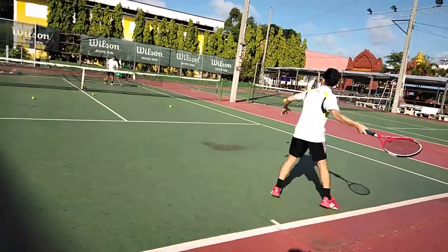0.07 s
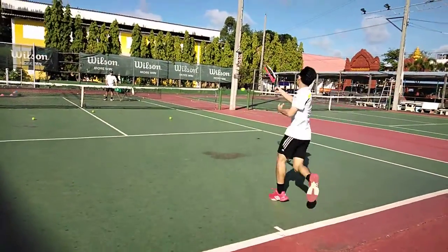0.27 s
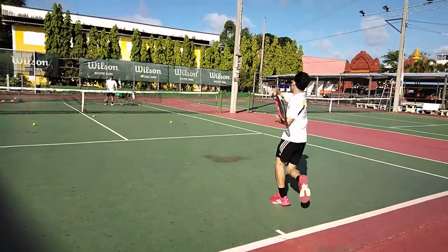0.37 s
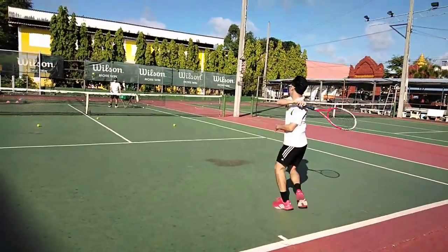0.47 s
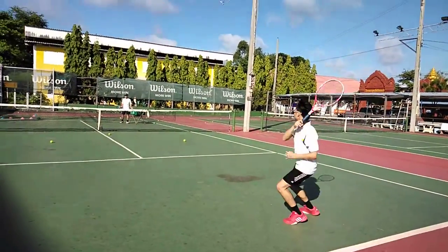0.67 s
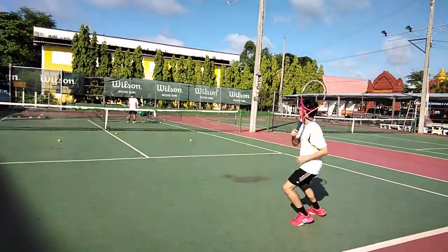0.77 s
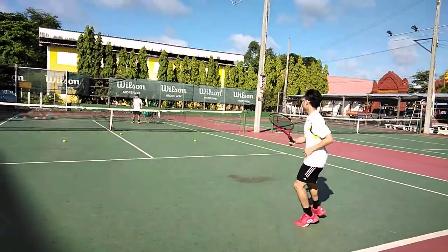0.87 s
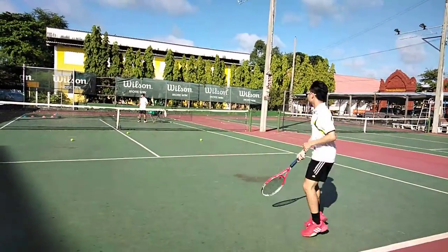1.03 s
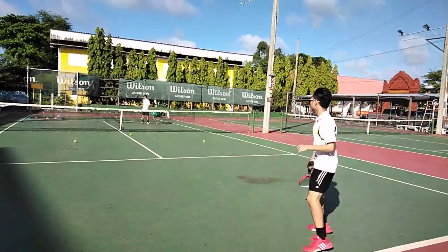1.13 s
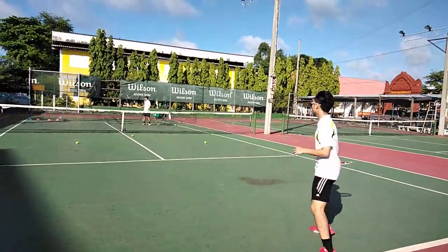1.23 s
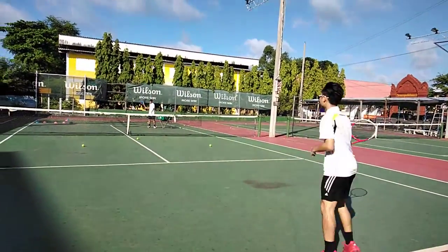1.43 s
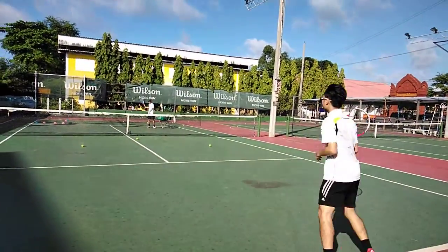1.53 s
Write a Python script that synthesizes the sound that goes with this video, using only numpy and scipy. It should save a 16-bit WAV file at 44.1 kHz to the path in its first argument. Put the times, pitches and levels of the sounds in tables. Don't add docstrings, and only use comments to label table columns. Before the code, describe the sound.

A tennis racket strikes a ball close by with a crisp, hollow pop, just after a short rising shoe squeak; then a landing sole chirps and feet scuff and tap on an open hard court.

```python
import sys
import numpy as np
from scipy import signal
from scipy.fft import rfft, irfft, next_fast_len
from scipy.io import wavfile
from scipy.ndimage import map_coordinates

SR = 44100
rng = np.random.default_rng(int(sys.argv[2]) if len(sys.argv) > 2 else 0)


def master(y):
    cut = np.clip(np.atleast_2d(y).T, -1, 1)
    pcm = np.round(cut * 32767)
    wavfile.write(sys.argv[1], SR, pcm.astype(np.int16))


def ratio(d):
    e = np.asarray(d, float) / 20
    return 10 ** e


N = 70560

SNAP_S = [
    .0006,
    .0047,
    .0065,
]


def unit(x):
    return x / np.sqrt(np.mean(x ** 2) + 1e-20)


def along(points, hz):
    f, v = np.transpose(points)
    return np.interp(np.log(hz + 1), np.log(f + 1), v)


def wobble(rate, count):
    knots = rng.standard_normal(int(count * rate / SR) + 4)
    return map_coordinates(knots, [np.arange(count) * rate / SR])


def filtered(x, response):
    m = next_fast_len(len(x) + 8192)
    return irfft(rfft(x, m) * response(np.fft.rfftfreq(m, 1 / SR)), m)[:len(x)]


def noise(response):
    return unit(filtered(rng.standard_normal(SR // 4), response))


def add(track, s, x):
    part = track[round(s * SR):][:len(x)]
    part += x[:len(part)]


def ring(hz, t60, swell, after=0):
    t = np.maximum(np.arange(SR // 4) / SR - after, 0)
    x = np.sin(2 * np.pi * hz * t) * ratio(-60 * t / t60) * (1 - np.exp(-t / swell))
    return x / np.abs(x).max()


def slips(hz, losses_db):
    turn = 2 * np.pi * np.cumsum(hz * (1 + 0.014 * wobble(500, len(hz)))) / SR
    tone = np.sin(turn)
    for k, loss in enumerate(losses_db):
        tone = tone + ratio(loss) * np.sin((k + 2) * turn)
    rasp = 1 + 0.26 * wobble(1500, len(hz))
    return tone * rasp


def traffic():
    # frequency in Hz, level in dB per Hz.
    hiss_colour = [(88, -49.5), (150, -1.5), (330, -7.5), (1170, -10.5), (1660, -16.5), (5000, -25.5),
                   (10000, -28), (16000, -28)]
    # time in seconds, level change in dB.
    drift_points = [(0, -2), (.2, -0.5), (.6, 3), (1.0, -3.5), (1.3, -2), (1.6, -1)]
    hiss = unit(filtered(rng.standard_normal(N), lambda f: ratio(along(hiss_colour, f))))
    drift_db = np.interp(np.arange(N) / SR, *np.transpose(drift_points)) + 0.2 * wobble(6.4, N)
    return ratio(-64 + drift_db) * hiss


def wind():
    # frequency in Hz, level in dB per Hz.
    rumble_colour = [(8.8, -23.5), (15, 2), (47, -0.5), (103, -8), (141, -11), (200, -22), (260, -91),
                     (440, -120)]
    # time in seconds, level in dB.
    gusts = [(0.0, -62), (0.248, -60.5), (0.454, -66), (0.664, -64), (.79, -55.5), (0.9, -61.5),
             (1.1, -61.5), (1.255, -61.5), (1.31, -65), (1.45, -61), (1.6, -64.5)]
    rumble = filtered(rng.standard_normal(N), lambda f: ratio(along(rumble_colour, f)))
    lumps = unit(rumble * ratio(2.3 * wobble(12.0, N)))
    gust_db = np.interp(np.arange(N) / SR, *np.transpose(gusts)) + 2.5
    return ratio(gust_db) * lumps


def echoes(walls, mirror, pivot_hz):
    answer, t = np.zeros(N), np.arange(SR // 4) / SR
    lead = 256
    for delay, db, tilt_db, smear in walls:
        scatter = rng.standard_normal(len(t)) * np.exp(-t / smear)
        burst = (1 - mirror) * scatter / np.linalg.norm(scatter) + mirror * (t == 0)
        tilt = lambda f: ratio(tilt_db * np.log2(np.clip(f, 150, 9000) / pivot_hz))
        burst = filtered(np.roll(burst, lead), tilt)
        add(answer, delay - lead / SR, ratio(db) * burst)
    return answer


def thin_tail():
    # frequency in Hz, t60 in seconds.
    tail_t60 = [(100, 0.6), (250, 0.66), (500, 0.93), (1000, 1.4), (4000, 0.85), (8000, 0.75),
                (15000, 0.41)]
    # frequency in Hz, level in dB.
    tail_colour = [(100, 11), (1000, -2), (2500, -0.5), (4000, -1.5), (7000, 1), (15000, 1)]
    patchy = rng.standard_normal(N) * ratio(2.1 * wobble(89.2, N))
    hz, t, z = signal.stft(patchy, SR, nperseg=256)
    decay_db = -60 * t / along(tail_t60, hz)[:, None]
    build_up = 1 - np.exp(-t / 0.04)
    z = z * ratio(decay_db + along(tail_colour, hz)[:, None]) * build_up
    tail = signal.istft(z, SR, nperseg=256)[1][:N]
    return ratio(-18.5) * tail / np.linalg.norm(tail)


def court(x, send, walls, mirror, pivot_hz):
    answer = echoes(walls, mirror, pivot_hz)
    add(answer, 0.012, thin_tail())
    sent = filtered(x, lambda f: ratio(along(send, f)))
    return x + signal.fftconvolve(sent, answer)[:N]


def scuffs_and_swish():
    scuff_starts = [.188, .2, .2, .205, .228, .242, .29, .32, .69, .713, 1.257, 1.281, 1.2812, 1.283, 1.295,
                    1.31, 1.312, 1.53, 1.53, 1.532, 1.553, 1.555, 1.58]
    # length in seconds, centre in Hz, width in octaves, level in dB.
    scuff_rows = [(.03, 6500, .6, -63), (.059, 12000, .36, -61), (.14, 2000, 2, -60),
                  (0.045, 4700, 0.66, -50.5), (0.013, 6800, 0.36, -58.5), (0.037, 980, 1.1, -58),
                  (.1, 13000, .79, -63), (0.085, 980, 2.32, -54), (.062, 13200, .51, -69.5),
                  (0.013, 3500, 0.17, -49), (.014, 1180, .7, -63.5), (.055, 15500, .06, -69.5),
                  (.022, 850, 0.45, -52), (.05, 11700, 1, -70.5), (0.029, 990, 0.67, -58.5),
                  (0.033, 5500, 1.3, -66), (.017, 6300, .3, -64.5), (0.058, 690, 0.91, -59.5),
                  (.016, 232, 0.84, -62.5), (.016, 8400, .6, -62.5), (0.022, 1240, 0.38, -67.5),
                  (.04, 15000, .3, -75.5), (0.0213, 800, 0.63, -66)]
    out, t = np.zeros(N), np.arange(SR // 4) / SR
    for s, (length, hz, octaves, db) in zip(scuff_starts, scuff_rows):
        band = lambda f: np.exp(-0.5 * (np.log2((f + 1) / hz) / (0.77 * octaves)) ** 2)
        grit = noise(band) * ratio(2.0 * wobble(203, len(t)))
        stroke = np.sin(np.pi * np.clip(t / length, 0, 1) ** 0.92) ** 0.66
        add(out, s, ratio(db) * grit * stroke)
    return out


def taps():
    tap_starts = [1.141, 1.2165, 1.2178, 1.222, 1.282, 1.5056, 1.5057, 1.506, 1.5308, 1.5345, 1.538, 1.5392,
                  1.5575, 1.583]
    # peak in dB, frequency in Hz, t60 in seconds.
    tap_rows = [(-62.5, 580, .038), (-54, 1900, .004), (-49.5, 920, .022), (-52, 191, .049),
                (-47.5, 860, 0.0093), (-57.5, 11000, .0006), (-46, 5300, 0.00062), (-54.5, 1820, .013),
                (-49, 3800, 0.00065), (-56, 6900, .002), (-55, 3600, .012), (-48, 9000, .001),
                (-53.5, 6500, .0063), (-48, 790, 0.004)]
    out, t = np.zeros(N), np.arange(SR // 4) / SR
    for s, (db, hz, t60) in zip(tap_starts, tap_rows):
        click = 0.55 * noise(lambda f: 1 / (1 + (f / (1.5 * hz)) ** 4)) * ratio(-60 * t / 0.005)
        add(out, s, ratio(db) * (ring(hz, t60, 0.00018) + click))
    return out


def landing_chirps():
    # start in seconds, length in seconds, pitch in Hz, level in dB, overtone loss in dB.
    chirp_rows = [
        (0.713, 0.0081, 3293, -35, -8),
        (0.715, 0.012, 3488, -34.5, -19),
        (0.724, 0.016, 4293, -43, -21),
        (0.749, .013, 4310, -52, -26),
    ]
    out = np.zeros(N)
    for start, length, pitch, level, loss in chirp_rows:
        count = round(length * SR)
        tone = slips(pitch * np.linspace(1, 1.013, count), [loss, 2.3 * loss])
        add(out, start, ratio(level) * np.hanning(count) ** 0.67 * tone)
    return out


def pivot_squeak():
    # time in seconds, pitch in Hz, level in dB.
    squeak_path = [
        (.188, 3400, -59.5),
        (0.1925, 3380, -40),
        (0.196, 3368, -48.5),
        (.204, 3835, -35),
        (0.211, 4191, -22),
        (0.215, 4280, -26.5),
        (0.221, 4360, -29.5),
        (0.2237, 4620, -30.5),
        (0.229, 4500, -48),
    ]
    squeak_overtones = [-27, -31]
    catch_times = [
        .2075,
        .2128,
        .2185,
        .2222,
    ]
    catch_dips = [-1.5, -6, -15.5, -6]
    out = np.zeros(N)
    s, hz, db = np.transpose(squeak_path)
    t = np.arange(s[0], s[-1], 1 / SR)
    level_db = np.interp(t, s, db)
    pressure_db = 1.2 * (level_db + 25)
    tone = slips(np.interp(t, s, hz), [loss + pressure_db for loss in squeak_overtones])
    grip_db = sum(dip * np.exp(-((t - at) / 0.00063) ** 2) for at, dip in zip(catch_times, catch_dips))
    stutter_db = 1.5 * wobble(284, len(t))
    add(out, s[0], np.sqrt(2) * ratio(level_db + grip_db + stutter_db) * tone)
    return out


def string_load(t):
    load_s = 0.0043
    let_go = ratio(-60 * np.maximum(t - load_s, 0) / 0.005)
    load = ratio(0.5) * np.clip(t / load_s, 0, 1) ** 1.4 * let_go
    return load * np.sin(2 * np.pi * 550 * t)


def frame_ring():
    # start after contact in seconds, frequency in Hz, level in dB, swell and t60 in seconds.
    frame_modes = [
        (0.0021, 192, -20, 0.00061, 0.024),
        (0.003468, 706, -5, 0.0011, 0.0212),
        (0.00453, 950, -5.5, 0.00046, .03),
        (0.004912, 1300, -15.5, 0.00056, 0.028),
        (.0043, 1587, -12, 0.00011, 0.0099),
        (0.0022, 5200, -24, 0.0004, 0.012),
        (0.00383, 2334, -19.5, 0.00044, 0.01),
        (0.0067, 2940, -18.5, 0.00024, 0.0046),
    ]
    return sum(ratio(db) * ring(hz, t60, swell, after) for after, hz, db, swell, t60 in frame_modes)


def ball_snaps(t):
    snap_levels = [-6, -4.5, -6]
    snap_widths = [.00006, 0.00011, 0.00017]
    out = np.zeros(len(t))
    for s, db, width in zip(SNAP_S, snap_levels, snap_widths):
        side = np.where(t < s, 2, 0.5)
        out -= ratio(db) * np.exp(-np.abs(t - s) / side / width)
    return out


def felt_hiss(t):
    # frequency in Hz, level in dB.
    felt_colour = [(500, -7.5), (2000, 2.5), (4700, -9), (6500, -3.5), (9800, -18), (15000, -25)]
    contact_s = 0.007
    rub_db = -60 * np.maximum(t - contact_s, 0) / 0.012 + 2.5 * wobble(900, len(t))
    felt = noise(lambda f: ratio(along(felt_colour, f))) * ratio(rub_db)
    fizz = ratio(-23.5 - 60 * t / 0.015) * noise(lambda f: f ** 2 / (f ** 2 + 8900 ** 2))
    return fizz + ratio(-17.5 - 60 * t / 0.04) * felt * (t > SNAP_S[0])


def racket():
    out, t = np.zeros(N), np.arange(SR // 4) / SR
    strike = string_load(t) + frame_ring() + ball_snaps(t) + felt_hiss(t)
    add(out, 0.3596, ratio(-12) * strike)
    dip_hz, dip_width_hz = 289.8, 100
    swing = lambda f, share: dip_hz ** 2 - f ** 2 + 1j * share * f * dip_width_hz
    return filtered(out, lambda f: swing(f, ratio(-14)) / swing(f, 0.84))


def scene():
    # frequency in Hz, level in dB.
    racket_send = [(100, -6), (320, 5), (620, -7.5), (1000, 2), (1500, 2.5), (2500, 2.5), (6500, -5.5),
                   (12000, -5)]
    squeak_send = [(1000, -1.5), (3400, -14), (4000, -19.5), (4200, -5), (4310, 2.5), (4420, -7),
                   (4700, -13), (9000, 1.5)]
    sole_send = [(300, 7), (1000, -6.5), (3000, 8), (3400, 2), (3800, 4.5), (4300, -2.5), (7000, 4),
                 (12000, -7)]
    # delay in seconds, level in dB, tilt in dB per octave, smear in seconds.
    racket_walls = [(0.0246, -16, 2.5, 0.002), (.041, -17, -0.5, 0.0017), (.069, -24, 3, 0.0036),
                    (0.092, -23, 4, .004), (0.1338, -16, -0.5, 0.0013), (.141, -25.5, -1, 0.0034),
                    (0.152, -24.5, 0, 0.0025), (0.165, -27, -2.5, 0.0008), (0.198, -36.5, -3, 0.0017),
                    (0.238, -27, -4, 0.0016), (.264, -33.5, -3, .003), (0.344, -32, 5.5, 0.0031),
                    (0.399, -34.5, -2, 0.0037)]
    pivot_walls = [(.02, -18, 0.0073, .004), (.036, -18.5, 0, .003), (.043, -13, 0, .002),
                   (.056, -23.5, 0, .003), (.074, -26.5, 0, .003), (.089, -26.5, 0, .005),
                   (.11, -29, 0.023, .004), (.135, -25, 0, .006)]
    sole_walls = [(.0255, -15, -0.5, 0.0021), (.039, -20.5, 5, 0.0033), (.057, -29.5, -2.5, 0.0033),
                  (.086, -18.5, -0.5, .006), (.092, -19, 3, 0.0018), (.122, -28.5, -0.5, 0.0049),
                  (.138, -25, -2, .008), (.158, -26, 0, .005), (.196, -31, -0.5, .005),
                  (.40, -33.5, -8, .012)]
    shoe_mirror = 0.297
    pivot = court(pivot_squeak(), squeak_send, pivot_walls, shoe_mirror, 3500)
    steps = court(landing_chirps() + scuffs_and_swish() + taps(), sole_send, sole_walls, shoe_mirror, 3500)
    strike = court(racket(), racket_send, racket_walls, 0.52, 1000)
    return (strike + pivot + steps + traffic() + wind())[None]


def top_cut(x):
    return signal.sosfilt(signal.butter(12, 16070, fs=SR, output="sos"), x)


def record(dry):
    # centre in Hz, width in Hz, level in dB.
    mic_bumps = [
        (3570, 450, 1),
        (6860, 870, 4.5),
        (15700, 1900, 5.5),
    ]
    bumps_db = lambda f: sum(db * np.exp(-((f - hz) / width) ** 2) for hz, width, db in mic_bumps)
    heard = filtered(dry[0], lambda f: ratio(bumps_db(f)) * (f < 16030))
    return top_cut(heard[None])


dry = scene()
out = record(dry)
master(out)
```